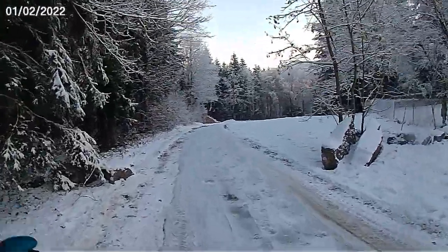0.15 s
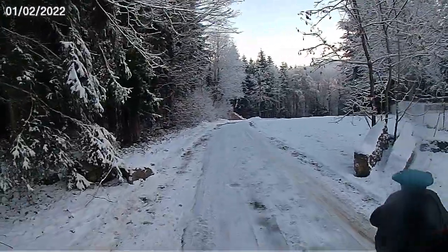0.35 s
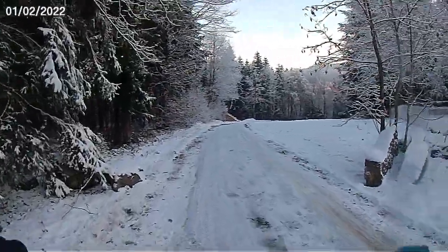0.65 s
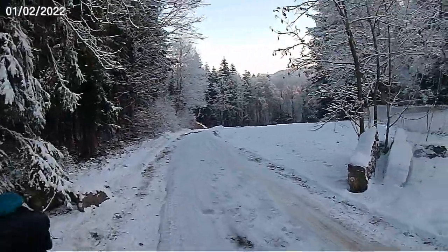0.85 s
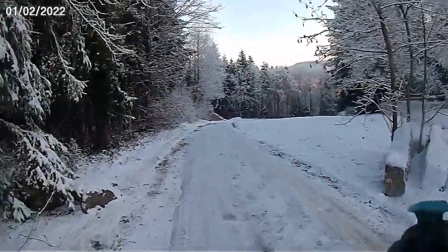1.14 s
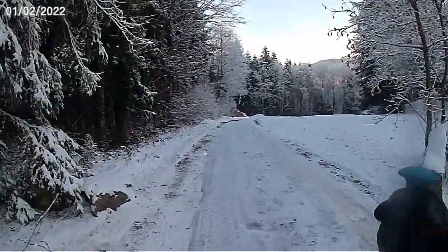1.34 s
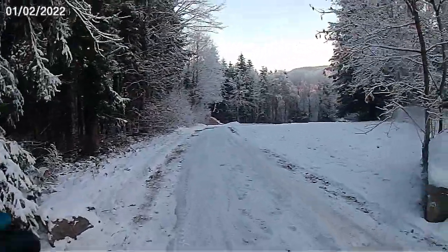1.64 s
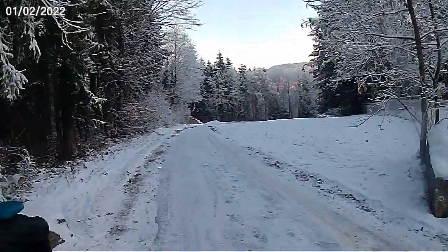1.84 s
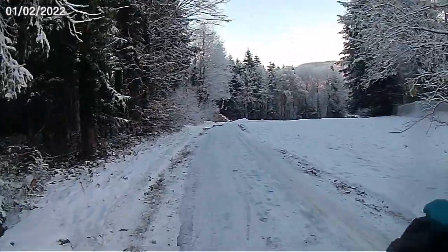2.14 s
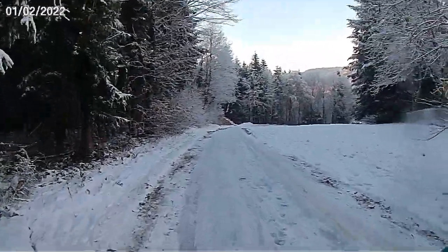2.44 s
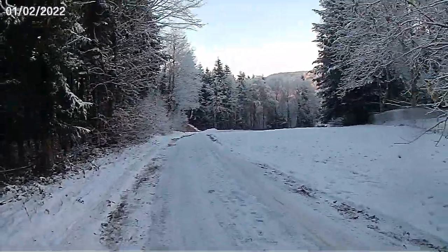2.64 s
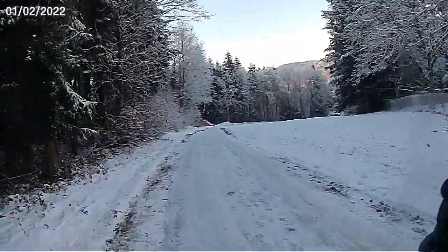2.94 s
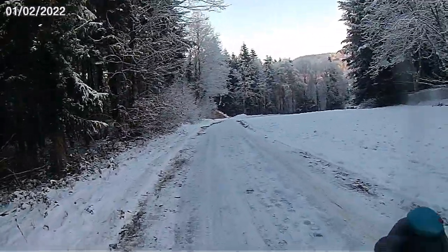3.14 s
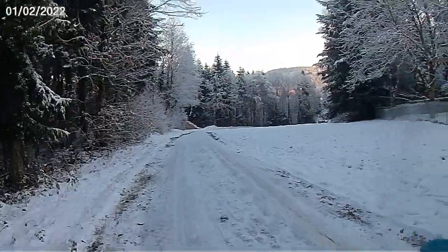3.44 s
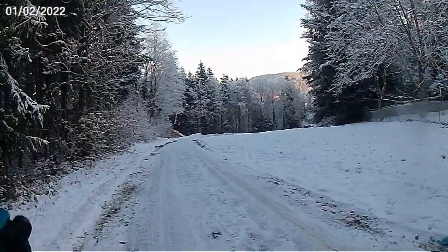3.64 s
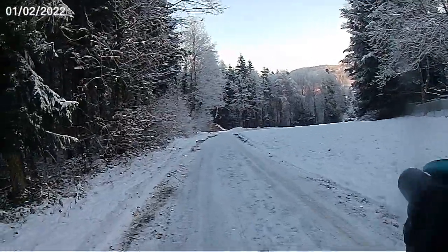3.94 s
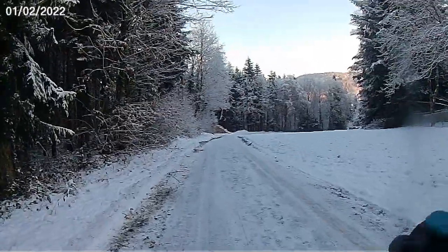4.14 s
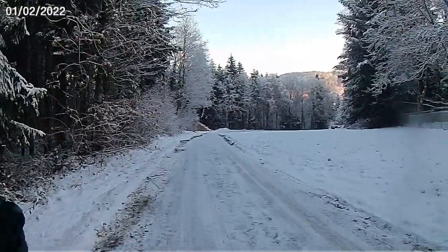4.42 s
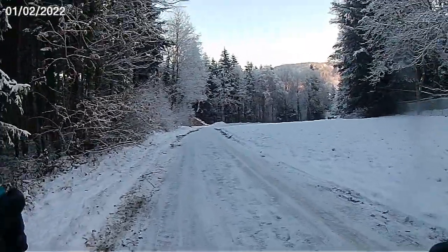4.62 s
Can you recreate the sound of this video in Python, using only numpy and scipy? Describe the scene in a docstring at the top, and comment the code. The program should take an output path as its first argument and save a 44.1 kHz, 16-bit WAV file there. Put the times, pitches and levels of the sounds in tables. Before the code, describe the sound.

Someone walks quickly on a snowy road, boots crunching twice a second, poles clicking on ice, clothing rustling and the microphone thumping.

```python
"""A snowy forest road, packed hard: a brisk walk with poles, heard from a small cased camera on the chest.
Boots crush snow into bursts of grains; each pole tip clicks just before, a scrape exciting damped modes.
Each landing also jolts the camera, as slow pressure swings with thuds and rumble of filtered noise.
The gear knocks softly, the jacket rustles as grains, and a sleeve rubs as a gliding tone with its octave.
A quiet, steady hiss of coloured noise lies behind."""
import sys
import numpy as np
from scipy import signal
from scipy.fft import rfft, irfft, next_fast_len
from scipy.io import wavfile
from scipy.ndimage import uniform_filter1d

SR = 44100
rng = np.random.default_rng(int(sys.argv[2]) if len(sys.argv) > 2 else 0)


def int16_out(signal):
    """Quantize to a 16-bit WAV file."""
    q = np.round(np.clip(np.atleast_2d(signal).T, -1, 1) * 32767)
    wavfile.write(sys.argv[1], SR, q.astype(np.int16))


N = 210625
TIME = np.arange(N) / SR

# footfalls, levels before each layer's gain: (time [s], snow gives way for [s], crunch [dB], grit [dB],
# jolt [dB], thud [dB], delay until the camera drops back [s], sway of that [dB], thump of that [dB])
FOOTFALLS = [(0.112, 0.029, -45, -65.5, -9.5, -42.5, 0.16, -20.5, -29),
             (0.57, 0.0067, -41.5, -66.5, -13, -41.5, 0.13, -22, -27.5),
             (1.027, 0.019, -44.5, -67.5, -10.5, -45.5, 0.12, -15.5, -25.5),
             (1.469, 0.068, -44, -69.5, -11, -46, .135, -22, -22.5),
             (1.927, 0.035, -45.5, -67, -9, -38.5, 0.12, -19.5, -24.5),
             (2.352, 0.068, -43.5, -68, -11.5, -46.5, 0.13, -10.5, -25.5),
             (2.808, .035, -48, -70, -19, -39.5, 0.096, -11, -28),
             (3.281, 0.036, -44.5, -71, -7.5, -41, 0.12, -16, -23.5),
             (3.751, 0.023, -43.5, -63, -9.5, -45.5, .08, -12, -27),
             (4.209, .018, -47, -68, -12.5, -41.5, 0.077, -17, -26),
             (4.64, 0.028, -43, -65, -6.5, -37.5, .105, -18, -22.5)]
# the forefoot pushes off and grinds the snow: (time [s], half length [s], crunch [dB], grit [dB])
PUSH_OFFS = [(0.64, 0.0086, -61, -77), (1.112, 0.0061, -70, -74), (2.455, .016, -52, -72),
             (2.877, 0.0067, -52.5, -71.5), (3.381, 0.0084, -56, -73), (3.823, 0.011, -48.5, -64.5)]
# hard lumps of snow snapping under a boot: (time [s], peak level before the layer's gain [dB])
SNOW_SNAPS = [(0.117, -38), (0.463, -45), (1.92, -38.5), (2.351, -40), (2.571, -49.5), (2.687, -49),
              (3.016, -50.5), (3.768, -35.5), (3.812, -40.5), (4.213, -40.5), (4.222, -39), (4.256, -46.5),
              (4.636, -48)]
# spectrum of packed snow giving way: (frequency [Hz], relative density [dB per Hz])
CRUNCH_SPECTRUM = [(250, -11), (400, -10.5), (520, -13.5), (740, -8.5), (1000, -8), (1350, -3), (1650, -8),
                   (1950, -11), (2250, -26.5), (2700, -30.5), (3500, -37)]
# spectrum of its finer grit: (frequency [Hz], relative density [dB per Hz])
GRIT_SPECTRUM = [(1800, -63), (2400, 7), (2850, 3.5), (3500, 2), (4200, 1), (4900, -4), (5500, -28),
                 (6300, -12.5), (8000, -59), (10000, -66)]
# the snow packs quickly under the heel and falls silent more slowly
PACK_DB_PER_S, SETTLE_DB_PER_S, GRIT_SETTLE_DB_PER_S = 488, 190.5, 219
# a fainter creak goes on while the weight rolls over the sole
ROLL_DB, ROLL_RISE_DB_PER_S, ROLL_FALL_DB_PER_S = -15, 76, 94.5


def boots():
    """Granular fracture: packed snow yields in clumps of dense grains, with finer grit and hard snaps."""
    crunch_gain, grit_gain = np.zeros(N), np.zeros(N)
    for s, half_s, crunch_db, grit_db in PUSH_OFFS:
        push_off = swell(s, half_s)
        crunch_gain += from_db(crunch_db) * push_off
        grit_gain += from_db(grit_db) * push_off
    for s, hold_s, crunch_db, grit_db, *_ in FOOTFALLS:
        roll = from_db(ROLL_DB) * envelope(s, hold_s, ROLL_RISE_DB_PER_S, ROLL_FALL_DB_PER_S)
        crunch_step = envelope(s, hold_s, PACK_DB_PER_S, SETTLE_DB_PER_S)
        grit_step = envelope(s, hold_s, PACK_DB_PER_S, GRIT_SETTLE_DB_PER_S)
        crunch_gain += from_db(crunch_db) * np.maximum(crunch_step, roll)
        grit_gain += from_db(grit_db) * np.maximum(grit_step, roll)
    # one uneven clumping is shared by the coarse and the fine grains
    clumps = from_db(2 * wobble(.004))
    coarse = colour(grains(per_s=1100, spread_db=4), CRUNCH_SPECTRUM)
    fine = colour(grains(per_s=2000, spread_db=2.5), GRIT_SPECTRUM)
    crunch = crunch_gain * steadied(clumps * coarse, .025)
    grit = grit_gain * steadied(clumps * fine, .08)
    snaps = np.zeros(N)
    for s, peak_db in SNOW_SNAPS:
        blow = contact(crumble=0.18, crumble_s=0.0044, tail_db=-16, tail_s=0.013)
        add(snaps, s, at_peak(colour(blow, CRUNCH_SPECTRUM), peak_db))
    return from_db(-2.0) * crunch + from_db(4.0) * grit + from_db(7) * snaps


# pole tips on ice: (time [s], scrape decay [s], then the low, middle, high and top ring [dB],
# each the energy of the whole ring averaged over 10 ms)
POLE_STRIKES = [(0.078, 0.003, -46, -55, -56, -60.5), (0.51, 0.0095, -48.5, -44.5, -61.5, -59.5),
                (0.998, 0.0048, -49, -49.5, -62, -65.5), (1.4309, 0.0046, -42.5, -49, -66, -56.5),
                (1.8774, 0.002, -45.5, -54, -53.5, -58), (2.367, 0.0047, -57, -52, -58, -60),
                (2.7436, 0.0032, -29, -41, -31, -45.5), (3.2227, 0.0017, -32, -40, -53.5, -51.5),
                (3.714, 0.0068, -40, -45, -52.5, -68), (4.166, 0.0017, -28, -34, -40.5, -39.5),
                (4.1718, 0.0011, -37, -30, -66, -52), (4.594, 0.0012, -37.5, -42.5, -49.5, -53)]
# modes of the shaft, one list for each of those four ranges: (frequency [Hz], width [Hz], level [dB])
SHAFT_MODES = [
    [(1137, 230, -5), (1430, 128, 9), (1463, 280, -27)],
    [(1956, 140, 13), (2145, 510, -7)],
    [(3260, 260, -11), (3500, 270, -8), (3720, 310, -4.5), (4130, 240, -18), (4490, 260, -13)],
    [(4800, 180, -3), (5320, 240, -4), (5740, 260, 1), (6120, 130, -6.5), (6280, 105, 2), (6830, 310, 0.5),
     (7480, 400, -5.5), (7980, 110, -3), (8570, 500, -21)],
]
BITE_RISE_S = .0006    # the tip takes this long to dig in


def poles():
    """Modal excitation: a tip scraping into ice rings the shaft's damped modes in a listed balance."""
    out, t = np.zeros(N), TIME[:SR // 10]
    for s, scrape_s, *range_db in POLE_STRIKES:
        bite = contact(crumble=.18, crumble_s=scrape_s, tail_db=-23, tail_s=.011)
        bite = bite * (1 - 0.6 * np.exp(-t / BITE_RISE_S))
        click = np.zeros(len(t))
        for modes, level_db in zip(SHAFT_MODES, range_db):
            ring = np.zeros(len(t))
            for k, (hz, width_hz, db) in enumerate(modes):
                # a second, wider resonance softens the onset
                mode = resonate(resonate(bite, hz, width_hz), hz, 5 * width_hz)
                # neighbouring modes swing in opposite senses
                ring += (-1) ** k * from_db(db) * mode
            click += from_db(level_db) * ring / np.sqrt(np.sum(ring ** 2) / (SR // 100))
        click_db = 20 * np.log10(np.max(np.abs(click)))
        # broad ice crack, and a dull stab from the snow under it
        crack = at_peak(resonate(resonate(bite, 4000, 5900), 5500, 8500), click_db - 27)
        stab = at_peak(resonate(resonate(bite, 850, 490), 970, 1000), click_db - 18)
        add(out, s - .0005, click + crack + stab)
    return out


# pack and harness shifting, levels before each layer's gain:
# (time [s], half length [s], rumble [dB], thud [dB])
HARNESS_SHIFTS = [(0.308, .02, -24.5, -55), (0.515, 0.011, -32, -43), (0.763, 0.031, -30, -40),
                  (0.928, 0.019, -38, -45), (1.188, 0.011, -24.5, -70), (1.803, 0.022, -35, -67),
                  (2.26, 0.034, -41.5, -69), (2.713, .03, -34.5, -41), (2.957, 0.02, -21, -74),
                  (3.161, 0.042, -36, -38.5), (3.598, 0.016, -27.5, -41), (3.657, 0.0055, -37, -31.5),
                  (3.722, 0.019, -21, -31), (4.017, 0.032, -50, -45), (4.14, 0.074, -36.5, -40),
                  (4.533, 0.017, -34, -53)]
# spectrum of the rumble through the body: (frequency [Hz], relative density [dB per Hz])
RUMBLE_SPECTRUM = [(10, -5), (22, 5), (38, 10.5), (55, 0), (75, -16.5), (100, -20), (160, -29.5)]
# spectrum of the thuds: (frequency [Hz], relative density [dB per Hz])
THUD_SPECTRUM = [(60, -18), (100, 5.5), (130, 5), (185, -7.5), (290, -8), (400, -17), (600, -25)]
# spectrum of air moving past the microphone: (frequency [Hz], relative density [dB per Hz])
DRAUGHT_SPECTRUM = [(10, -5.5), (22, 4), (45, -14.5), (75, -15), (140, -27.5)]
# the jolt reaches the camera just after the heel lands
JOLT_LAG_S, SWAY_HZ, REBOUND_HZ, THUMP_HZ = 0.02884, 17.1, 15.8, 65


def body():
    """Inertial motion: landings (FOOTFALLS) swing the camera out and back, with thumps and rumble."""
    sway, thumps = np.zeros(N), np.zeros(N)
    rumble_gain, thud_gain = np.zeros(N), np.zeros(N)
    for s, half_s, rumble_db, thud_db in HARNESS_SHIFTS:
        shift = swell(s, half_s)
        rumble_gain += from_db(rumble_db) * shift
        thud_gain += from_db(thud_db - 12.5) * shift
    for s, hold_s, _, _, jolt_db, thud_db, after_s, back_db, thump_db in FOOTFALLS:
        jolt, back = s + JOLT_LAG_S, s + after_s
        sway += from_db(jolt_db) * swing(jolt, SWAY_HZ)
        sway += from_db(back_db) * swing(back, REBOUND_HZ)
        thumps += from_db(thud_db + 6.5) * swing(jolt, THUMP_HZ)
        thumps += from_db(thump_db - 0.5) * swing(back, THUMP_HZ)
        rumble_gain += from_db(jolt_db - 13.5) * envelope(s, hold_s, 211, 150)
        rumble_gain += from_db(thump_db - 6) * envelope(back, 0.012, 495, 327)
        thud_gain += from_db(thud_db + 0.5) * envelope(s, 0.024, 209, 206)
        thud_gain += from_db(thump_db - 24) * envelope(back, 0.0033, 585, 248)
    # a faint wandering thud goes on all the time
    thud_gain += from_db(-62 + 5.5 * wobble(0.017))
    rumble = rumble_gain * steadied(colour(rng.standard_normal(N), RUMBLE_SPECTRUM), 0.0412)
    thud = thud_gain * steadied(colour(rng.standard_normal(N), THUD_SPECTRUM), 0.0325)
    draught = steadied(colour(rng.standard_normal(N), DRAUGHT_SPECTRUM), 0.61)
    return sway + thumps + rumble + from_db(-1.14) * thud + from_db(-39) * draught


# dull knocks of the gear: (time [s], peak level [dB])
GEAR_KNOCKS = [(0.2275, -31), (1.141, -31), (3.669, -35), (4.751, -38)]
# spectrum of a knock: (frequency [Hz], relative density [dB per Hz])
KNOCK_SPECTRUM = [(100, 24), (280, 13), (500, -3), (750, 9), (1000, 8), (1350, 5), (1900, -7), (3000, -24),
                  (8000, -40)]


def gear():
    """Impact: straps and fittings knock dully, a short blow filtered by what it strikes."""
    out = np.zeros(N)
    for s, peak_db in GEAR_KNOCKS:
        blow = contact(crumble=.06, crumble_s=.004, tail_db=-30, tail_s=.015)
        add(out, s, at_peak(colour(blow, KNOCK_SPECTRUM), peak_db))
    return out


# rustles between footfalls, before each layer's gain:
# (time [s], half length [s], crinkle [dB], grit [dB])
JACKET_RUSTLES = [(0.338, 0.022, -57, -70), (0.77, 0.091, -56, -72), (1.254, 0.06, -56.5, -72),
                  (1.45, 0.042, -47, -68), (1.684, 0.037, -53, -68), (2.127, 0.059, -52.5, -65.5),
                  (2.316, 0.034, -51, -63), (2.703, 0.18, -59, -72), (3.09, 0.12, -60, -76),
                  (3.455, .06, -54.5, -65.5), (3.658, 0.055, -62, -71), (3.95, 0.039, -56, -67),
                  (4.14, 0.1, -50.5, -66), (4.384, 0.027, -67, -75)]


def jacket():
    """Buckling: stiff cloth crinkles in tiny clicks, always faintly, in the same spectra as the snow."""
    crinkle_gain = from_db(-67 + 6.8 * wobble(0.052))
    grit_gain = np.zeros(N)
    for s, half_s, crinkle_db, grit_db in JACKET_RUSTLES:
        rustle = swell(s, half_s)
        crinkle_gain += from_db(crinkle_db) * rustle
        grit_gain += from_db(grit_db) * rustle
    crinkle = crinkle_gain * rms_one(colour(grains(per_s=4000, spread_db=1.0), CRUNCH_SPECTRUM))
    grit = grit_gain * rms_one(colour(grains(per_s=4400, spread_db=-1.0), GRIT_SPECTRUM))
    return from_db(-4.5) * crinkle + from_db(-1.5) * grit


# arm swings sliding the sleeve over the jacket:
# (time of top speed [s], half length [s], ribs passed at top speed [per s], level there [dB])
ARM_SWINGS = [(0.354, .048, 342, -47), (1.338, 0.064, 290, -52), (2.17, 0.0307, 360, -55.5),
              (3.09, .05, 218, -49), (4.017, .06, 350, -49.5)]
ARM_SLOWING = .3    # share of its speed that the arm has lost half a length from the middle
SLEEVE_DB_PER_OCTAVE = 9.5    # faster sliding is louder


def sleeve():
    """Friction of ribbed cloth: an uneven zip whose pitch and level follow the speed of the arm."""
    out = np.zeros(N)
    stumble = 1 + .07 * wobble(.003)
    grip = from_db(2.5 * wobble(.004))
    for s, half_s, top_hz, db in ARM_SWINGS:
        slowing = ARM_SLOWING / (1 - ARM_SLOWING) * np.minimum(((TIME - s) / half_s) ** 2, 2)
        speed = 1 / (1 + slowing)    # relative to the top speed
        phase = 2 * np.pi * np.cumsum(top_hz * speed * stumble) / SR
        overtone = from_db(-5.0) * (top_hz * speed / 350) ** 4    # faster sliding is sharper
        gain = from_db(db + SLEEVE_DB_PER_OCTAVE * np.log2(speed))
        gain *= envelope(s - half_s, 2 * half_s, 200, 200)
        out += gain * grip * (np.sin(phase) + overtone * np.sin(2 * phase))
    return out


# spectrum of the hush: (frequency [Hz], relative density [dB per Hz])
AIR_SPECTRUM = [(150, -2.5), (300, -7.5), (550, -17.5), (760, -14.5), (1030, -21), (1340, -8.5),
                (1900, -19), (2200, -21.5), (2600, -23), (4200, -25), (5300, -27.5), (8000, -29),
                (10000, -32), (15500, -33.5)]


def air():
    """Stationary noise: the steady hush of the forest and the microphone."""
    return from_db(-59) * rms_one(colour(rng.standard_normal(N), AIR_SPECTRUM))


def contact(crumble, crumble_s, tail_db, tail_s):
    """Impulse on snow: one sharp push, a brief crumbling, and a faint scatter from the surroundings."""
    t = TIME[:SR // 10]
    decay = np.exp(-t / crumble_s) + from_db(tail_db) * np.exp(-t / tail_s)
    push = rng.standard_normal(len(t)) * crumble * decay
    push[0] += 1
    return push


def grains(per_s, spread_db):
    """Random point process: clicks of either sign, their sizes spread exponentially in decibels."""
    sizes = from_db(spread_db * np.minimum(rng.exponential(1, N), 4))
    return (rng.random(N) < per_s / SR) * sizes * rng.choice([-1, 1], N)


def swing(s, hz):
    """Pressure pulse of one smooth movement out and back, centred on time s."""
    spread = np.minimum((np.pi * hz * (TIME - s)) ** 2, 50)
    return (2 * spread - 1) * np.exp(-spread)


def envelope(s, hold_s, rise_db_per_s, fall_db_per_s):
    """Exponential growth and decay: gain rises to 1 at time s, holds and dies away."""
    before, after = np.maximum(s - TIME, 0), np.maximum(TIME - s - hold_s, 0)
    return from_db(-rise_db_per_s * before - fall_db_per_s * after)


def swell(s, half_s):
    """Gaussian rise and fall of gain around time s."""
    return np.exp(-.5 * np.minimum(((TIME - s) / half_s) ** 2, 100))


def wobble(seconds):
    """Smoothed noise: a random wander of rms 1 that changes in about this time."""
    size = max(int(seconds * SR), 2)
    return rms_one(uniform_filter1d(uniform_filter1d(rng.standard_normal(N), size), size))


def resonate(x, hz, width_hz):
    """Damped resonance: a two-pole filter with gain about 1 at its top."""
    r = np.exp(-np.pi * width_hz / SR)
    zeros = np.array([1, 0, -1]) * (1 - r * r) / 2
    poles_of_filter = [1, -2 * r * np.cos(2 * np.pi * hz / SR), r * r]
    return signal.lfilter(zeros, poles_of_filter, x + 1e-18)


def colour(x, spectrum):
    """Minimum-phase filtering: a causal filter of the given spectrum, falling away beyond its ends."""
    size = 2 * next_fast_len(len(x))
    hz, db = np.transpose(spectrum)
    log_hz = np.log(np.arange(size // 2 + 1) * SR / size + 1)
    beyond = np.abs(log_hz - np.clip(log_hz, np.log(hz[0]), np.log(hz[-1])))
    log_gain = np.log(from_db(np.interp(log_hz, np.log(hz), db))) - 2 * beyond
    # folding the cepstrum onto positive times makes the filter causal
    cepstrum = irfft(log_gain)
    cepstrum[1:size // 2] *= 2
    cepstrum[size // 2 + 1:] = 0
    return irfft(rfft(x, size) * np.exp(rfft(cepstrum)))[:len(x)]


def steadied(x, seconds):
    """Running rms normalisation: evens out slow swells of a noise and keeps its fine grain."""
    power = uniform_filter1d(x ** 2, max(int(seconds * SR), 2))
    return x / np.sqrt(np.abs(power) + 1e-20)


def from_db(db):
    """Logarithmic level: decibels to amplitude gain."""
    return 10 ** (np.asarray(db) / 20)


def rms_one(x):
    """Effective value: scale to rms 1."""
    return x / np.sqrt(np.mean(x ** 2) + 1e-20)


def at_peak(x, db):
    """Peak value: scale a short sound to a peak level."""
    return from_db(db) * x / np.max(np.abs(x))


def add(out, s, sound):
    """Superposition: mix a short sound in at time s."""
    start = max(round(s * SR), 0)
    out[start:start + len(sound)] += sound[:N - start]


def scene():
    """Superposition of all sources, close and in the open air, as one channel."""
    return (boots() + poles() + body() + gear() + jacket() + sleeve() + air())[None]


# resonances of the camera case: (frequency [Hz], width [Hz], boost [dB])
CASE_MODES = [(765, 70, 3), (1335, 100, 4), (2480, 150, 3), (3500, 130, 3.5), (3980, 160, 3),
              (7700, 160, 2.5)]
CUTOFF_HZ = 15750


def record(dry):
    """Cavity resonance and band limit: the case rings with all it hears; ends eased, top cut."""
    cased = dry + sum((from_db(db) - 1) * resonate(dry, hz, width_hz) for hz, width_hz, db in CASE_MODES)
    ends = np.minimum(np.minimum(TIME, TIME[-1] - TIME) / .004, 1)
    top_cut = signal.ellip(12, .1, 90, CUTOFF_HZ, fs=SR, output="sos")
    return signal.sosfilt(top_cut, from_db(0.4) * cased * ends)


dry = scene()
out = record(dry)
int16_out(out)
```